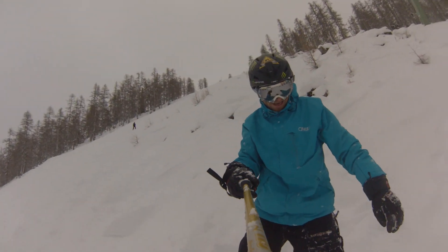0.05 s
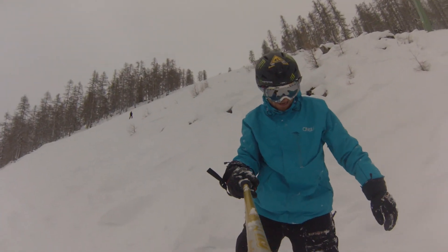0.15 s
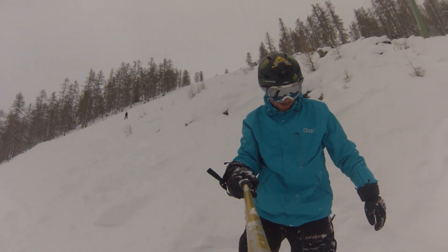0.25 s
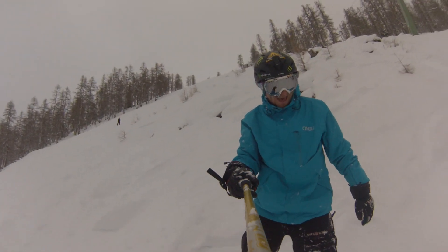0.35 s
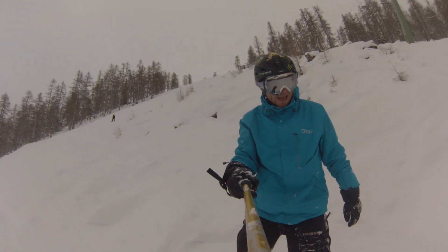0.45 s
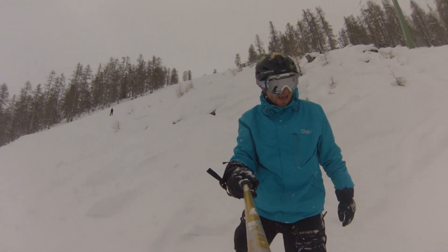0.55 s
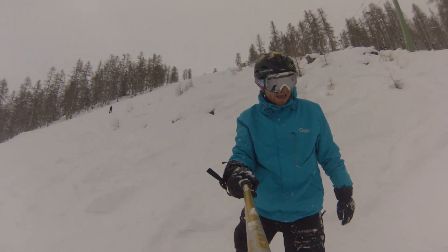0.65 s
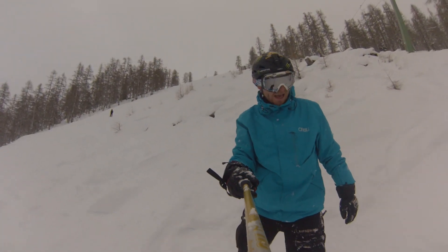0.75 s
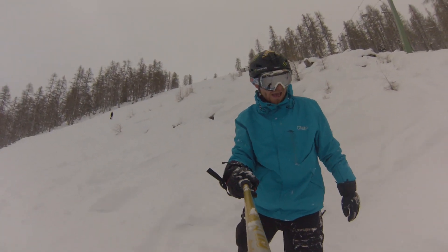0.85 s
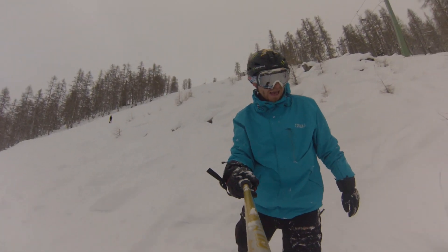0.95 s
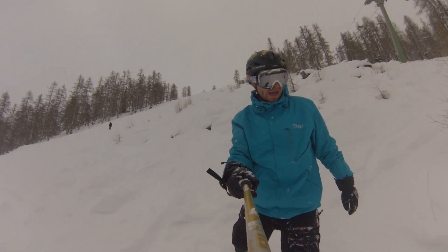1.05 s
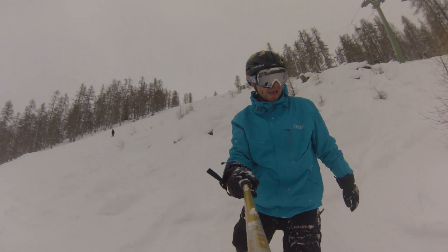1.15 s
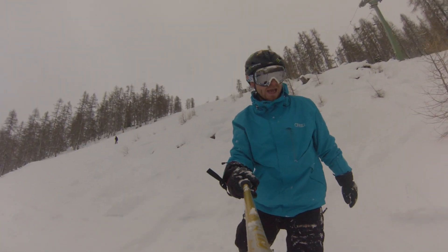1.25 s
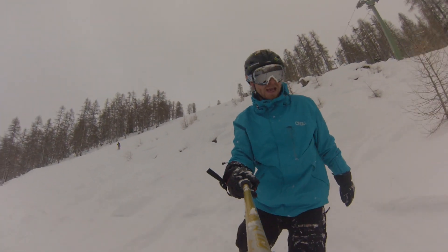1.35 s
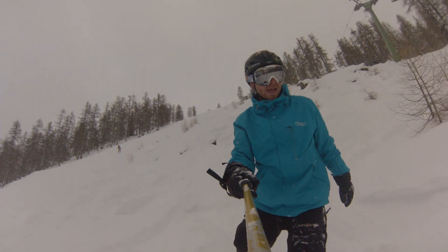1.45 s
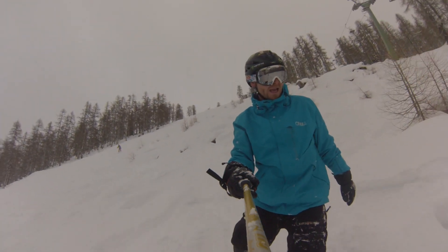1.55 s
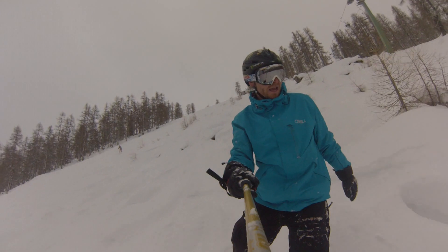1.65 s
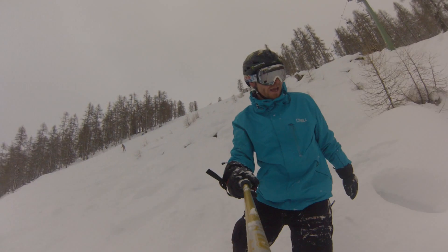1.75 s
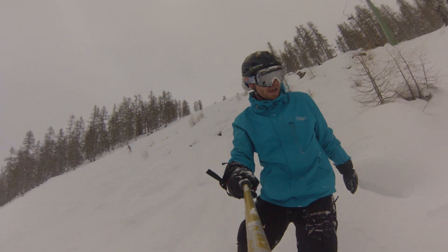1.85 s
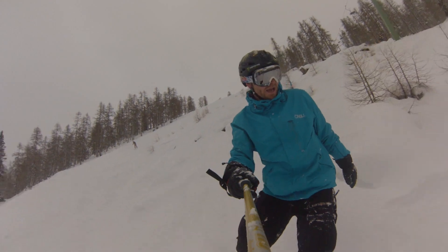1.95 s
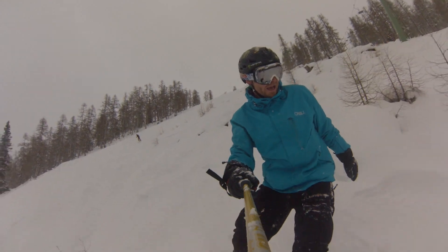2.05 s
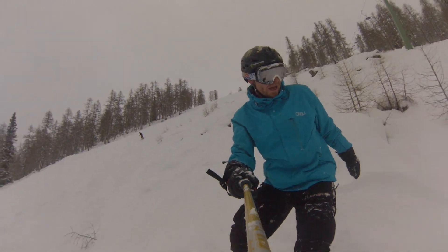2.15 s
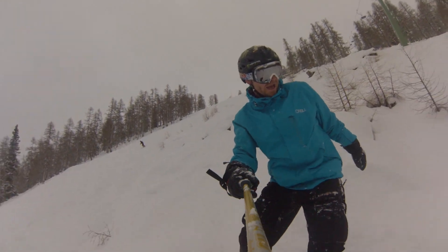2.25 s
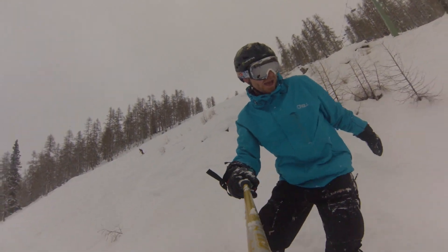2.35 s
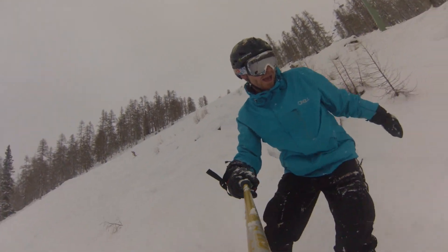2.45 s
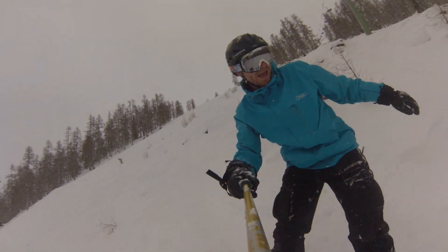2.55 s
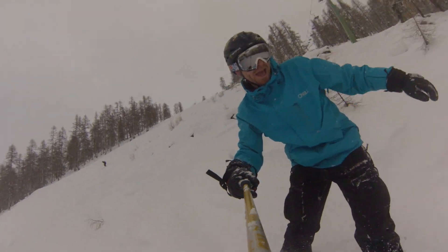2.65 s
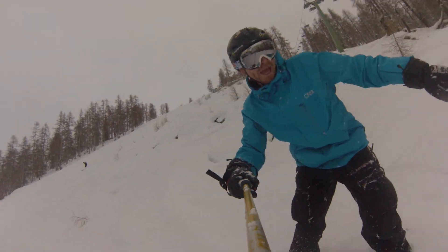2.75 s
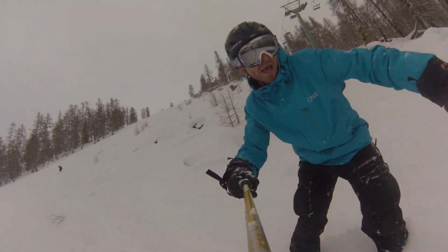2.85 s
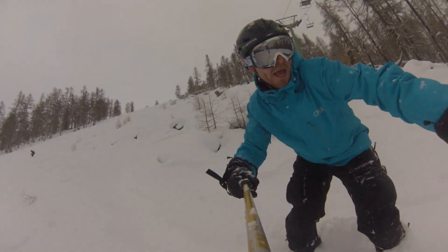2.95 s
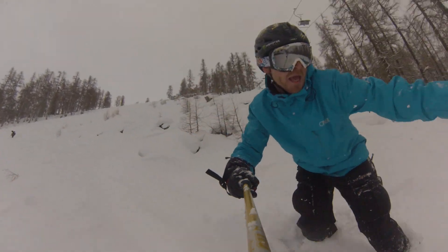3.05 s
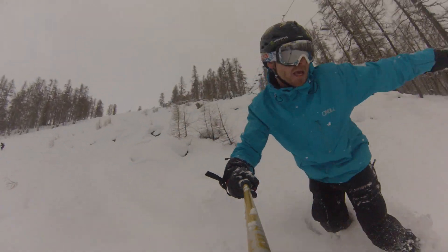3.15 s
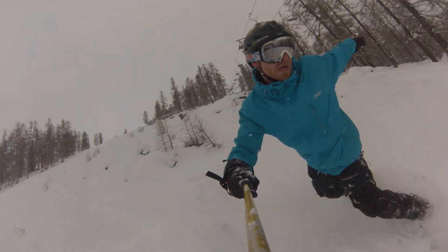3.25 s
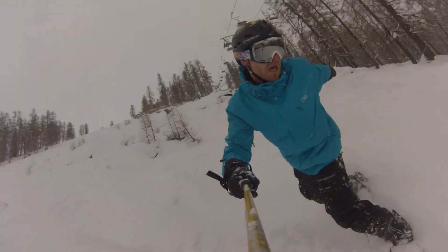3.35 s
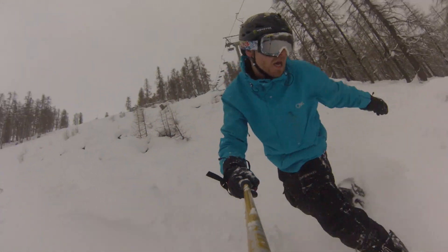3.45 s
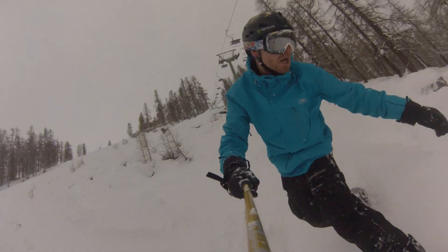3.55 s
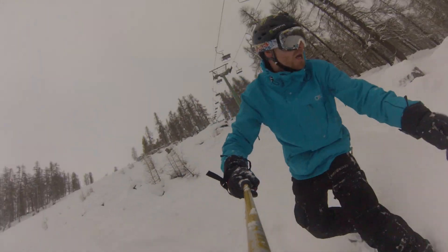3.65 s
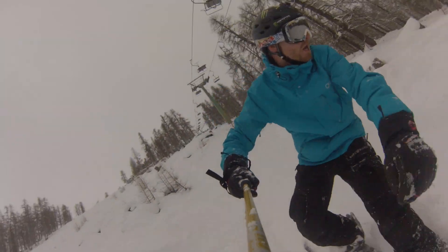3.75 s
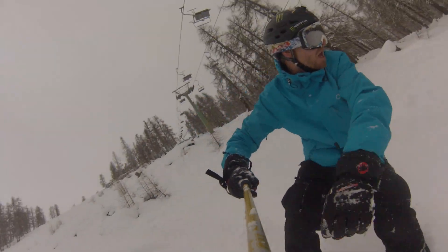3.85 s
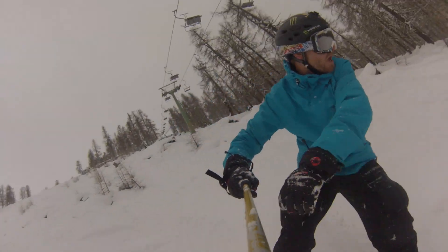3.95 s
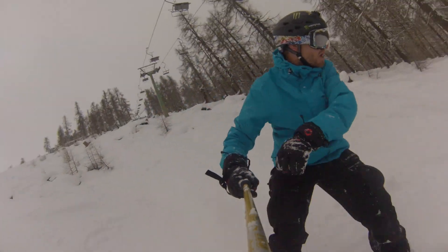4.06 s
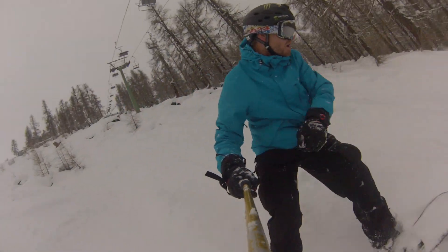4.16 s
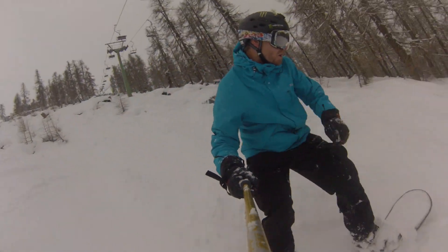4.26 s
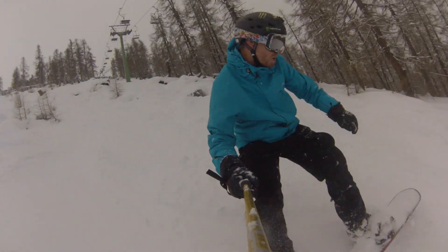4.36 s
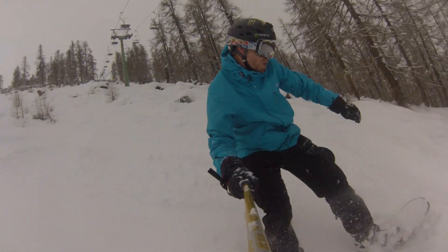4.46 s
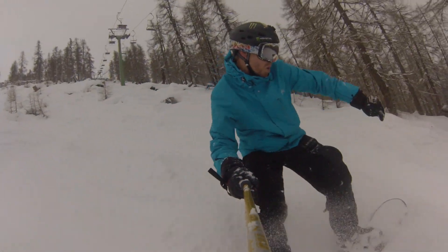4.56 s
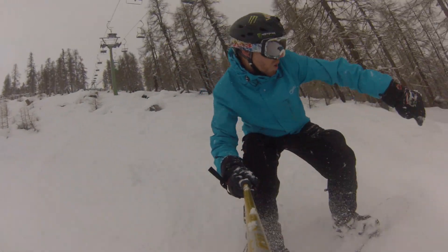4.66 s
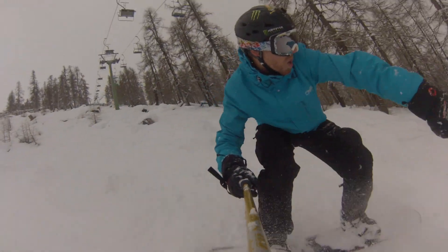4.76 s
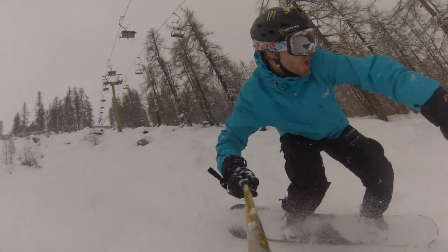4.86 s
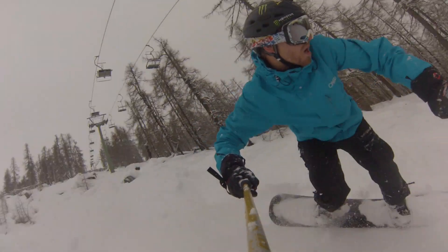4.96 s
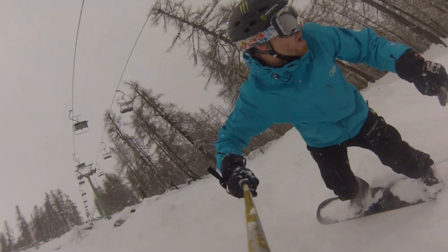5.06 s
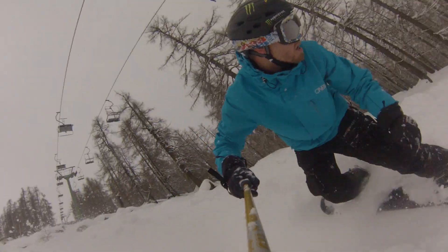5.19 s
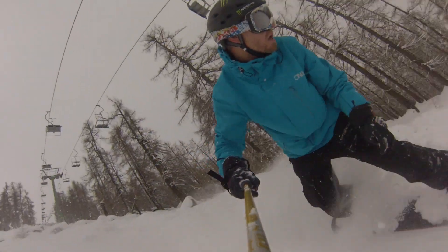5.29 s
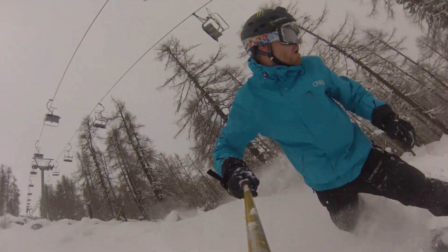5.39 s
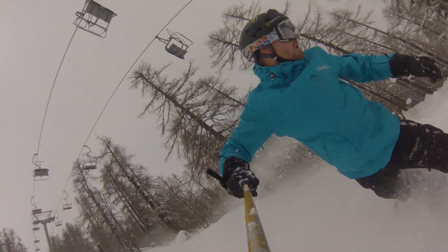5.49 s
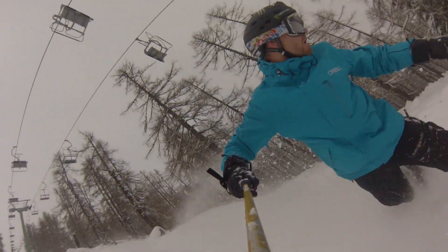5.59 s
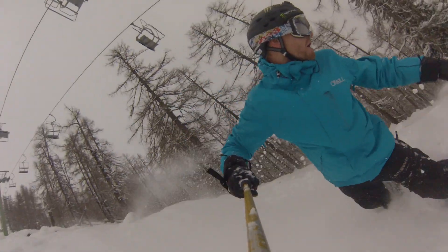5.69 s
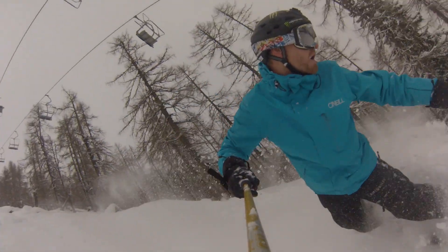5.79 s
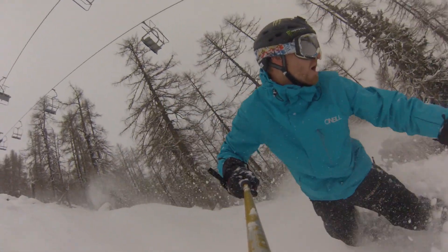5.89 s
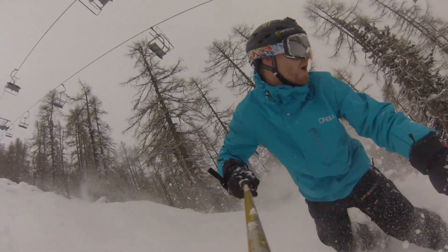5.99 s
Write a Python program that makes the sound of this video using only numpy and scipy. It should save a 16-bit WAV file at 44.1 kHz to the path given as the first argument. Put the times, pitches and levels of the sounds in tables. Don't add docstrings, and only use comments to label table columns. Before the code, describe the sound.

Heard from inside a sealed camera case on a hand-held pole: deep bassy wind buffeting and booming jolts dominate. Snowboard chatter, edge scrape and powder spray are faint and muffled at first. After about three seconds the wind swells and the ride roughens, with dull knocks, soft thumps and tiny ice ticks. Near the end a snow lump cracks on the housing. Faint microphone hiss lies underneath, on an open slope without echo.

```python
import sys
import numpy as np
from scipy import signal
from scipy.fft import rfft, irfft
from scipy.io import wavfile
from scipy.ndimage import uniform_filter1d

SR = 44100
rng = np.random.default_rng(int(sys.argv[2]) if len(sys.argv) > 2 else 0)


def gain_from_db(level_db):
    decades = np.asarray(level_db, float) / 20
    return 10 ** decades


def persist_wave(psi):
    counts = np.round(np.clip(psi, -1, 1) * 32767).astype(np.int16)
    wavfile.write(sys.argv[1], SR, np.atleast_2d(counts).T)


N = 265790

# time_s, level_db
AIR = [(0, -40.5), (.3, -40), (.6, -42.5), (1.0, -46), (1.7, -40.5), (2.0, -40.5), (2.5, -41),
       (3.05, -40.5), (3.25, -27.5), (3.6, -26), (3.9, -32.5), (4.25, -27.5), (4.55, -33), (5.0, -35),
       (5.2, -27.5), (5.45, -23), (5.8, -31.5), (6.03, -26.5)]
# middle_s, swell_db, length_s
GUSTS = [(0.026, 11.5, 0.035), (0.108, 7.5, 0.048), (0.217, 0, 0.092), (0.331, 10.5, 0.035),
         (0.87, 6.5, 0.071), (1.02, -8, 0.066), (1.434, 7.5, 0.061), (1.702, -8.5, 0.1), (1.877, 5, 0.049),
         (2.444, 4, 0.25), (2.495, -11, 0.065), (2.582, 4.5, 0.095), (2.795, 13.5, 0.038),
         (3.306, -25, 0.028), (3.456, 1.5, 0.08), (3.59, 7, 0.023), (3.806, -2.5, 0.036),
         (3.938, 14, 0.017), (4.109, -24, 0.035), (4.206, 2, 0.14), (4.383, -9, 0.055), (4.435, 8, 0.04),
         (4.472, -13, 0.059), (4.637, 11.5, 0.046), (4.834, 15.5, 0.024), (5.158, 6, 0.069),
         (5.286, 7, 0.083), (5.4, 11, 0.015), (5.709, -12, 0.015), (5.75, 12.5, 0.032)]
# peak_s, level_db
JOLTS = [(0.137, -18), (0.179, -17), (0.444, -49), (0.569, -30), (0.893, -22.5), (1.016, -14), (1.141, -25),
         (1.225, -15.5), (2.153, -25), (2.552, -11.5), (2.651, -18.5), (2.801, -28.5), (2.94, -31),
         (3.035, -19.5), (3.336, -25), (3.389, -18.5), (3.545, -42), (3.606, -28), (3.909, -31),
         (4.223, -18), (4.305, -18.5), (4.349, -16.5), (4.459, -15.5), (4.707, -15.5), (4.748, -12.5),
         (5.003, -19), (5.298, -16), (5.518, -18), (5.751, -31), (5.883, -12), (5.963, -18)]
# middle_s, length_s, level_db
ROCKS = [(0.153, .1, -37.5), (.82, 0.086, -44), (1.02, 0.052, -40), (2.327, 0.038, -47),
         (2.567, 0.042, -41), (3.0, 0.23, -51), (3.4, 0.13, -50), (3.576, 0.13, -35), (3.75, 0.13, -42),
         (4, .1, -33.5), (4.17, 0.059, -29.5), (4.247, 0.065, -25.5), (4.434, 0.036, -23.5),
         (4.595, 0.091, -32.5), (4.844, 0.072, -35), (4.94, 0.077, -36), (5.115, 0.089, -33.5),
         (5.35, 0.13, -34), (5.5, .1, -36), (5.633, 0.088, -27.5), (5.76, 0.089, -28.5), (5.847, .05, -35),
         (5.989, 0.036, -30.5)]
# pitch_hz, level_db (per Hz)
TURBULENCE = [(100, -1.5), (130, 1), (185, -9.5), (240, -15.5), (400, -17.5), (800, -22.5), (1500, -45.5)]
# middle_s, length_s, level_db
SLAPS = [(0.016, 0.047, -64), (1.02, 0.033, -56.5), (1.43, 0.037, -63), (1.556, 0.042, -77),
         (2.323, 0.088, -67), (2.57, 0.049, -58), (2.955, 0.54, -66), (3.286, 0.025, -54.5),
         (3.412, .06, -64), (3.494, 0.042, -58), (3.784, 0.034, -56), (4.23, 0.093, -56.5),
         (4.39, 0.13, -57), (4.6, 0.052, -48), (4.648, 0.023, -57), (5.092, 0.021, -55),
         (5.186, 0.068, -56), (5.326, 0.21, -60.5), (5.744, 0.087, -61), (6.02, 0.033, -59)]
# time_s, edge_pressure_db, snow_bumpiness_db
RIDE = [(0, -11, -3), (.3, -7, -2), (.6, -16, -7), (1.1, -3, 6), (1.6, -9, -5.5), (2.0, -8.5, 0),
        (2.5, -3, -2.5), (2.8, -4, -1), (3.05, -2, 5.5), (3.5, -2.5, 5), (3.9, -2.5, 6), (4.3, 6, -4),
        (4.6, 4, 8), (4.95, -2.5, 4), (5.3, 7, -5), (5.65, 1.5, -2), (5.85, 0.5, 0), (6.03, 12, -2)]
# middle_s, length_s, level_db, fineness (0 clods, 1 scrape, 2 powder, 3 crystals)
BURSTS = [(0.18, 0.15, -67.5, 0.62), (0.555, 0.32, -76.5, 3.0), (.8, 0.1, -91, .1), (1.6, 0.13, -71.5, 1.0),
          (2.05, 0.51, -71, 2.7), (2.41, 0.28, -82, 2.0), (3.12, 0.2, -70, .1), (3.34, 0.11, -67, 1.55),
          (3.44, 0.17, -65, 0.086), (3.535, 0.093, -70, 1.8), (3.62, 0.13, -73.5, 3.0),
          (3.722, 0.034, -64.5, 1.0), (3.772, 0.097, -73, 3.0), (3.802, 0.04, -63, .2),
          (3.934, 0.073, -64.5, 0.26), (3.988, 0.12, -72.5, 1.0), (4.164, 0.14, -64.5, 1.4),
          (4.27, 0.42, -66.5, 2.3), (4.415, 0.18, -65.5, 1), (4.589, 0.06, -52.5, 0.64),
          (4.64, 0.14, -59, 1.2), (4.65, 0.17, -64.5, 2.0), (4.104, 0.14, -78, 2.0),
          (4.91, 0.2, -60.5, 0.33), (5.03, 0.041, -73, 3.0), (5.233, 0.1, -66, 2.0),
          (5.347, 0.13, -67, 0.16), (5.4, 0.19, -66, 2.4), (5.64, .1, -62.5, 2.25),
          (5.75, 0.032, -59.5, .4), (5.956, 0.13, -72, 2), (6.02, 0.041, -57, 1.6)]
LAYER_DB = [-70.5, -74, -75, -78]
LAYER_FOLLOWS = [0.79, 0.71, 0.58, 0.35]
# pitch_hz, width_hz, level_db
SHELL = [(3870, 790, 4), (5420, 390, 6), (6800, 990, -1.5), (7800, 240, 5), (8830, 2100, -3.5)]
# pitch_hz, level_db (per Hz)
HISS = [(150, -9.5), (800, -19.5), (2200, -23), (4500, -26.5), (9000, -28.5), (11200, -31.5),
        (14000, -26.5), (15300, -31.5)]
# pitch_hz, width_hz, level_db
WHINE = [(5670, 90, -92), (11360, 70, -91)]
# time_s, level_db
WHINE_FADE = [
    (0, 5),
    (1.42, 6),
    (1.5, 0),
    (3.9, 0),
    (4.3, 4),
    (6.03, 1),
]
# start_s, level_db
THUMPS = [(.12, -49), (2.981, -51), (3.27, -50), (3.5, -40), (3.6, -48), (3.781, -49), (4.15, -45),
          (4.22, -45), (4.3, -40.5), (4.37, -48), (4.635, -47), (5.331, -38), (5.76, -49)]
# pitch_hz, level_db, t60_s (time to die away by 60 dB)
THUMP_MODES = [(126, 9, 0.084), (165, -4, 0.057), (190, -3, .04)]
# start_s, level_db, hardness_db
KNOCKS = [(0.128, -56, -7), (2.4065, -57, -7), (2.6472, -52, -12), (2.8983, -59, -11), (3.1074, -65, -9),
          (3.275, -52.5, -11), (3.379, -46.5, -3), (3.3894, -48, -2), (3.405, -55, -4), (3.4276, -47.5, -4),
          (3.455, -46, -1), (3.461, -48, -3), (3.4696, -43, -21), (3.489, -51, -2), (3.509, -51, -4),
          (3.6032, -42, -8), (3.726, -43, -4), (3.733, -47, -13), (3.7733, -57, -15), (3.785, -49, -10),
          (3.811, -56, -6), (3.822, -54, -10), (3.878, -58, -8), (3.899, -45.5, -6), (3.915, -52, 4),
          (3.9424, -53, -3), (3.974, -59, 1), (4.198, -49, -15), (4.361, -48, -16), (4.563, -53, -8),
          (4.576, -45, -8), (4.584, -45, -5), (4.592, -43, -9), (4.604, -58, -4), (4.621, -50, -4),
          (4.6394, -46, -9), (4.671, -56, -8), (5.031, -53.5, -1), (5.1453, -56, -16), (5.2984, -52, -19),
          (5.3125, -43.5, -13), (5.37, -43, 0), (5.392, -44, -2), (5.787, -59, -4), (5.833, -56, -10),
          (5.859, -54, 3), (5.983, -54, -13), (5.996, -47, -2), (6.013, -44, -1), (6.02, -43, -1)]
# pitch_hz, level_db, t60_s
HOUSING_MODES = [
    [(1174, -2, 0.03), (1370, 6.5, 0.019), (1590, 5, 0.024)],
    [(1950, -2, 0.011), (2240, -6.5, 0.014), (2510, -3, 0.011)],
    [(3620, -11, 0.0068), (4940, -15, 0.007), (5700, -7, 0.0065), (6730, 2.5, 0.0036)],
    [(9930, 14, 0.0057), (11700, 11, 0.006), (13200, 11, 0.0055), (14400, 8, 0.006)],
]
# time_s, pitch_hz, level_db
SQUEAK = [
    (.135, 1950, -90),
    (.146, 2110, -59),
    (.157, 2330, -60),
    (.18, 2450, -77),
    (.195, 2690, -69),
    (.208, 2800, -66),
    (.215, 2850, -95),
]
# start_s, pitch_hz, level_db, t60_s
PINGS = [(.8425, 15600, -62, .006), (1.383, 15600, -64, .006), (2.134, 4300, -47, 0.0083),
         (2.134, 5500, -55, .007), (2.134, 10900, -55, .007), (2.134, 12900, -44, .004),
         (3.736, 5000, -48, 0.0087), (4.17, 3940, -53, .015), (4.196, 5200, -46, .008),
         (4.555, 2300, -49, .025), (4.588, 2240, -48, .02), (4.601, 2170, -45, 0.022),
         (4.65, 4050, -52, .015), (4.7, 2420, -52, .02), (5.976, 2180, -50, 0.027), (5.98, 3750, -54, .02),
         (6.006, 3780, -44, .015), (6.01, 2010, -47, .025), (6.014, 3730, -53, .015)]
# start_s, level_db, weight_db, hardness_db, sharpness_db
GRAINS = [(0.843, -52.5, -11, 5.5, -3), (1.0313, -67, -10, 7, 6), (1.3836, -49, -16, -1.5, 2),
          (1.5657, -53, -16.5, -16, 4), (1.8597, -56, -18, 2.5, -5), (2.1348, -54, -20, -5, 11),
          (2.368, -59, -10, -5, -7), (2.5072, -58, -17, -1, -7), (2.8587, -58.5, -7, 2.5, -6),
          (3.7364, -63, -1, 9, -5), (4.1958, -50, -23, 2.5, -1), (4.4924, -55, -18, -2, -5),
          (4.498, -64, -8, -5, 13), (5.7341, -56, -3, -9, 4), (5.885, -57, -6, -20, 8),
          (5.9228, -60, -12, 1, 5), (5.9346, -51, -6, -7, 4), (5.9777, -57, -21, -1, -4),
          (6.0053, -52.5, 1, -1.5, 11)]
GRAIN_CONTACT_S = [.0003, .0003, .00015, 0]
# start_s, level_db
THUDS = [(1.01, -62), (2.549, -50), (3.274, -43), (3.787, -41.5), (4.134, -70), (4.552, -62), (4.577, -43),
         (4.592, -51), (4.637, -57), (4.796, -54), (5.229, -54), (5.309, -50)]
# pitch_hz, level_db, t60_s
THUD_MODES = [(234, -17.5, 0.016), (370, 2.5, 0.039), (500, 4, 0.014)]
# start_s, body_level_db, brittle_level_db
LUMP = [(4.8636, -51, -52), (4.872, -54, -66), (4.875, -56, -50), (4.8768, -50, -52), (4.8796, -37.5, -45),
        (4.8815, -39, -44), (4.884, -47, -52), (4.8858, -39.5, -44), (4.886, -33.5, -37), (4.888, -33, -46),
        (4.8912, -38, -44), (4.8935, -46, -58), (4.896, -50, -64)]
# pitch_hz, level_db, t60_s
LUMP_MODES = [(1020, 0.5, 0.016), (1370, 5.5, 0.018), (1600, -6, 0.011), (2280, -1, 0.0054),
              (5000, -2, 0.0031), (6900, 2, 0.0062), (9800, -12, 0.0091), (11500, -5, 0.0027),
              (14200, -16, .003)]


def rms_one(x):
    return x / np.sqrt(np.mean(x ** 2) + 1e-20)


def in_time(rows):
    s, *columns = np.transpose(rows)
    return [np.interp(np.arange(N) / SR, s, column) for column in columns]


def humps(middle_s, length_s, height, square):
    t = np.arange(N // 20 + 2) * 20 / SR
    out = np.zeros(len(t))
    for at, span, top in np.broadcast(middle_s, length_s, height):
        out += top * np.exp(-np.abs(2 * (t - at) / span) ** square)
    return np.interp(np.arange(N) / SR, t, out)


def drift(rate):
    r = np.exp(-40 * np.pi * rate / SR)
    slow = signal.lfilter([1], [1, -2 * r, r * r], rng.standard_normal(N // 20 + 3002))[3000:]
    return np.interp(np.arange(N) / 20, np.arange(len(slow)), rms_one(slow))


def coloured(points):
    hz, db = np.transpose(points)
    axis = np.fft.rfftfreq(N, 1 / SR) + 1
    gain = gain_from_db(np.interp(np.log(axis), np.log(hz), db, left=-90, right=-90))
    return rms_one(irfft(rfft(rng.standard_normal(N)) * gain, N))


def grains(per_s, spread_db):
    sizes = gain_from_db(spread_db * np.minimum(rng.exponential(1, N), 4)) * rng.choice([-1, 1], N)
    return rms_one(sizes * (rng.random(N) < per_s / SR))


def butter(x, hz, kind="low"):
    return signal.sosfilt(signal.butter(2, hz, kind, fs=SR, output="sos"), x)


def steep_low(x, hz, order):
    return signal.sosfilt(signal.cheby1(order, 1, hz, fs=SR, output="sos"), x)


def resonance(x, hz, width_hz):
    r = np.exp(-np.pi * width_hz / SR)
    return signal.lfilter([(1 - r * r) / 2, 0, (r * r - 1) / 2],
                          [1, -2 * r * np.cos(2 * np.pi * hz / SR), r * r], x)


def ring(clicks, hz, t60):
    r, w = gain_from_db(-60 / (t60 * SR)), 2 * np.pi * hz / SR
    return signal.lfilter([0, np.sin(w)], [1, -2 * r * np.cos(w), r * r], clicks + 1e-18)


def evened(x, window_s):
    size = int(window_s * SR)
    power = uniform_filter1d(uniform_filter1d(x ** 2, size), size)
    return x / np.sqrt(power + 0.007 * np.mean(x ** 2))


def strike(start_s, strength_db, modes, contact_s=0):
    chance_db = rng.normal(0, 2, (len(start_s), len(modes)))
    sides = rng.choice([-1, 1], chance_db.shape)
    at = np.round(np.asarray(start_s) * SR).astype(int)
    out = np.zeros(N)
    for k, (hz, level_db, t60) in enumerate(modes):
        clicks = np.zeros(N)
        clicks[at] = gain_from_db(strength_db + level_db + chance_db[:, k]) * sides[:, k]
        out += ring(clicks, hz, t60)
    size = int(contact_s * SR) + 1
    rasp = np.abs(rng.standard_normal(size)) * np.cos(2 * np.pi * modes[0][0] * np.arange(size) / SR)
    return np.convolve(out, rasp / np.abs(rasp).sum())[:N]


def buffeting(gust_db):
    lumps = butter(rng.standard_normal(N + SR), (9.5, 43.1), "band")
    lumps = butter(lumps, 51.2)[SR:]
    return gain_from_db(in_time(AIR)[0] + gust_db + 3.5) * evened(lumps, window_s=0.075)


def pole_shake():
    shake_hz, width_hz, shake_db = 93, 20, -45
    pole = resonance(rng.standard_normal(N + SR), shake_hz, width_hz)
    pole = resonance(pole, 0.87 * shake_hz, 2 * width_hz)[SR:]
    return gain_from_db(shake_db + in_time(RIDE)[1]) * evened(pole, window_s=0.24)


def pole_jolts():
    s, peak_db = np.transpose(JOLTS)
    clicks = np.zeros(N)
    clicks[np.round((s - 0.0065) * SR).astype(int)] = gain_from_db(peak_db - 4.5)
    return ring(clicks, 94.4, 0.084) + 0.11 * ring(clicks, 81, 0.011)


def rocking():
    s, length_s, db = np.transpose(ROCKS)
    rest_db = -51
    swing = butter(rng.standard_normal(N + SR), (43.8, 67.3), "band")[SR:]
    gain = np.sqrt(gain_from_db(2 * rest_db) + humps(s, length_s, gain_from_db(2 * db), square=0.93))
    return gain * evened(swing, window_s=0.065)


def eddies(gust_db):
    s, peak_db = np.transpose(JOLTS)
    felt_db = np.maximum(peak_db + 38, 0)
    stir_db = humps(s + 0.0074, 0.029, 0.096 * felt_db, square=2.4)
    eddy_db = -64.5 + 0.44 * (in_time(AIR)[0] + 34.5) + 0.42 * gust_db + 0.26 * in_time(RIDE)[1] + stir_db
    slap_s, slap_length_s, slap_db = np.transpose(SLAPS)
    slap_power = humps(slap_s, slap_length_s, gain_from_db(2 * slap_db), square=1.4)
    flutter_db = 2 * drift(25)
    return np.sqrt(gain_from_db(2 * eddy_db) + slap_power) * gain_from_db(3 + flutter_db) * coloured(TURBULENCE)


def wind():
    gust_s, swell_db, length_s = np.transpose(GUSTS)
    gust_db = humps(gust_s, length_s, swell_db, square=2)
    jolts = pole_jolts()
    low = buffeting(gust_db) + pole_shake() + jolts + rocking()
    sealed = steep_low(low, 99.75, order=6)
    leak = gain_from_db(-12) * resonance(low + 0.5 * jolts, 112, 33)
    return sealed + leak + eddies(gust_db)


def snow_gains():
    pressure_db = in_time(RIDE)[0]
    s, length_s, strength_db, fineness = np.transpose(BURSTS)
    gains = []
    for k, (db, share) in enumerate(zip(LAYER_DB, LAYER_FOLLOWS)):
        bed = gain_from_db(db + share * pressure_db)
        loss_db = 8.5
        if k == len(LAYER_DB) - 1:
            loss_db += 6
        burst_db = strength_db - loss_db * np.abs(fineness - k)
        gains.append(np.sqrt(bed ** 2 + humps(s, length_s, gain_from_db(2 * burst_db), square=2.15)))
    return gains


def chatter():
    rough = grains(500, 7.5) + 1.57 * rng.standard_normal(N)
    return rms_one(resonance(rough, 1420, 205) - 0.5 * resonance(rough, 1156, 296)
                   - 0.17 * resonance(rough, 1920, 600))


def edge_hiss():
    return rms_one(resonance(grains(2000, 5.1) + 0.95 * rng.standard_normal(N), 2205, 344))


def powder_spray():
    powder = grains(4000, 3.1) + 0.64 * rng.standard_normal(N)
    spray = np.zeros(N)
    for k, (hz, width_hz, db) in enumerate(SHELL):
        spray += (-1) ** k * gain_from_db(db) * resonance(powder, hz, width_hz)
    return steep_low(rms_one(spray), 9500, order=8)


def ice_crystals():
    flurries = gain_from_db(5.5 * np.tanh(drift(37))) * grains(3000, 4.3)
    return rms_one(resonance(resonance(flurries, 11120, 1100), 11100, 1600))


def board():
    chatter_gain, edge_gain, spray_gain, crystal_gain = snow_gains()
    bumps = drift(17)
    return (chatter_gain * gain_from_db(2.1 * bumps) * chatter()
            + edge_gain * gain_from_db(1.55 * bumps) * edge_hiss()
            + spray_gain * gain_from_db(0.27 * bumps + 1.9 * drift(56)) * powder_spray()
            + crystal_gain * ice_crystals())


def electronics():
    whine = np.zeros(N)
    for hz, width_hz, db in WHINE:
        narrow = resonance(resonance(rng.standard_normal(N), hz, width_hz), hz, width_hz)
        whine += gain_from_db(db) * rms_one(narrow)
    return gain_from_db(-67) * coloured(HISS) + gain_from_db(in_time(WHINE_FADE)[0]) * gain_from_db(drift(5.6)) * whine


def grip_thumps():
    return strike(*np.transpose(THUMPS), THUMP_MODES, contact_s=0.0074)


def mount_knocks():
    s, peak_db, hard_db = np.transpose(KNOCKS)
    return (strike(s, peak_db - 4, HOUSING_MODES[0], contact_s=0.0017)
            + strike(s, peak_db + hard_db + 3, HOUSING_MODES[1], contact_s=0.0034))


def squeak():
    pitch_hz, level_db = in_time(SQUEAK)
    phase = 2 * np.pi * np.cumsum(pitch_hz * (1 + 0.03 * drift(220))) / SR
    return gain_from_db(level_db + drift(43)) * np.sin(phase)


def click_rings():
    return sum(strike([s], np.array([db]), [(hz, 0, t60)], contact_s=0.0005) for s, hz, db, t60 in PINGS)


def ice_grains():
    s, grain_db, weight_db, hard_db, sharp_db = np.transpose(GRAINS)
    reach_db = weight_db, 0, hard_db, hard_db + sharp_db - 22
    return sum(strike(s, grain_db + db + 5, modes, contact_s)
               for db, modes, contact_s in zip(reach_db, HOUSING_MODES, GRAIN_CONTACT_S))


def case_thuds():
    s, peak_db = np.transpose(THUDS)
    return strike(s, peak_db - 5, THUD_MODES, contact_s=0.0045)


def breaking_lump():
    s, body_db, brittle_db = np.transpose(LUMP)
    body_modes, brittle_modes = LUMP_MODES[:3], LUMP_MODES[3:]
    count = 30
    crumb_s = np.linspace(4.873, 4.894, count) + rng.uniform(0, 0.00085, count)
    crumb_db = -53 + 3 * rng.standard_normal(count)
    broken = strike(s, body_db - 3, body_modes, contact_s=0.0008)
    broken += strike(s, brittle_db, brittle_modes) + strike(crumb_s, crumb_db, brittle_modes)
    return butter(broken, 540, "high")


def through_wall(x):
    return x - 0.33 * resonance(x, 3010, 650)


def scene():
    struck = (board() + grip_thumps() + mount_knocks() + click_rings() + ice_grains()
              + case_thuds() + breaking_lump())
    return (wind() + through_wall(struck) + electronics() + squeak())[None]


def ragged_top(x):
    out, together, width_hz = x.copy(), drift(30), 400
    less_room = 0.035 * (in_time(AIR)[0] + 40)
    for low_hz in np.arange(12400, 16200, width_hz):
        band_pass = signal.butter(3, [low_hz, low_hz + width_hz], "band", fs=SR, output="sos")
        band = signal.sosfiltfilt(band_pass, x)
        power = uniform_filter1d(band ** 2, size=128)
        quiet = np.clip(2 - power / gain_from_db(2 * -76), 0, 1)
        share = np.interp(low_hz, [12400, 14800, 15200], [1.5, 0.2, -3.0]) - less_room
        out -= band * quiet * np.clip(5 * (0.46 * together + 0.8 * drift(36) - share), 0, 1)
    return out


def low_pass(x):
    return signal.sosfilt(signal.butter(12, 16100, fs=SR, output="sos"), x)


def record(dry):
    rounded = 0.61 * np.tanh(dry / 0.58)
    cut = signal.sosfilt(signal.cheby2(16, 60, 16300, fs=SR, output="sos"), rounded)
    return low_pass(ragged_top(cut))


dry = scene()
out = record(dry)
persist_wave(out)
```